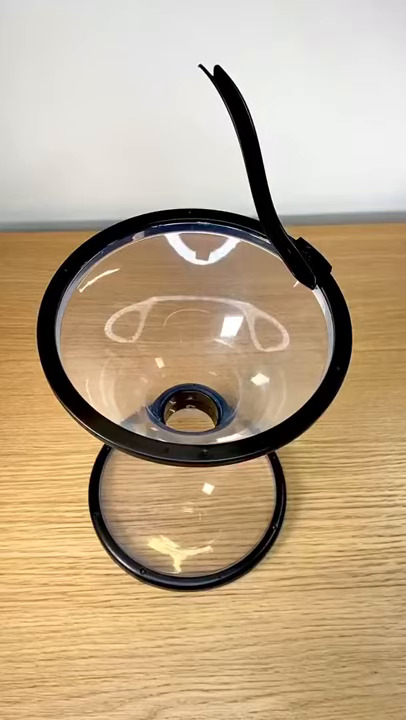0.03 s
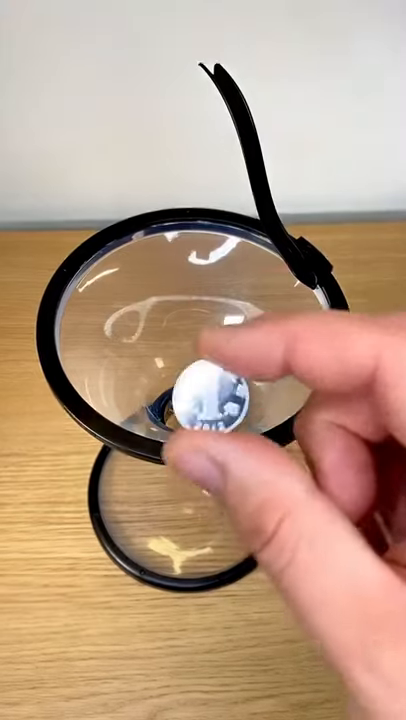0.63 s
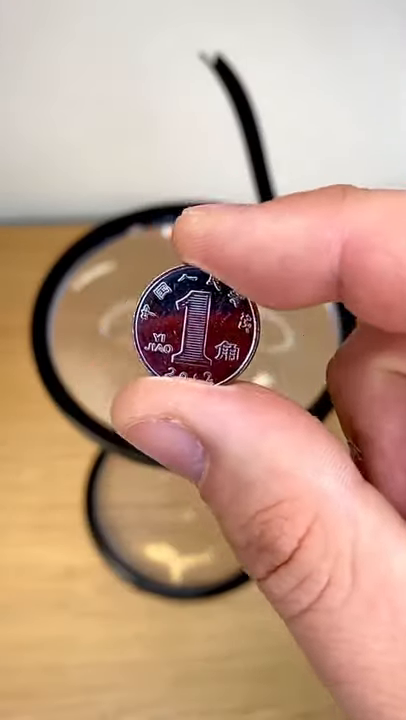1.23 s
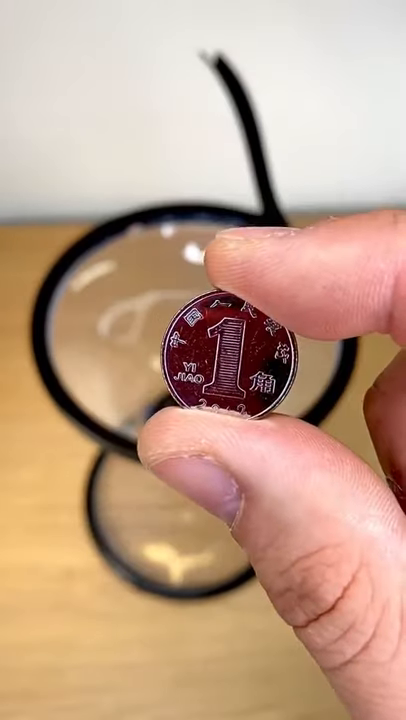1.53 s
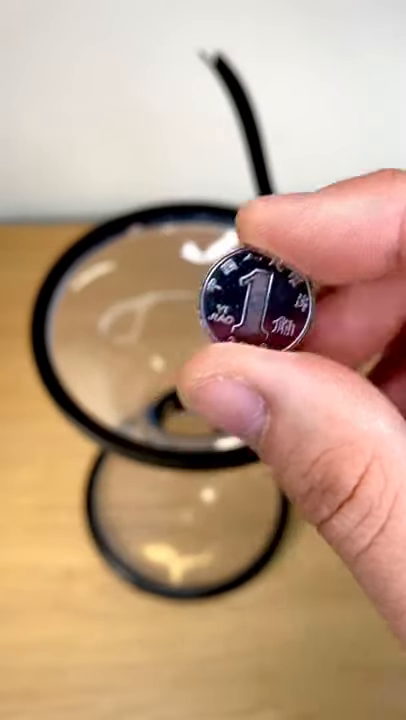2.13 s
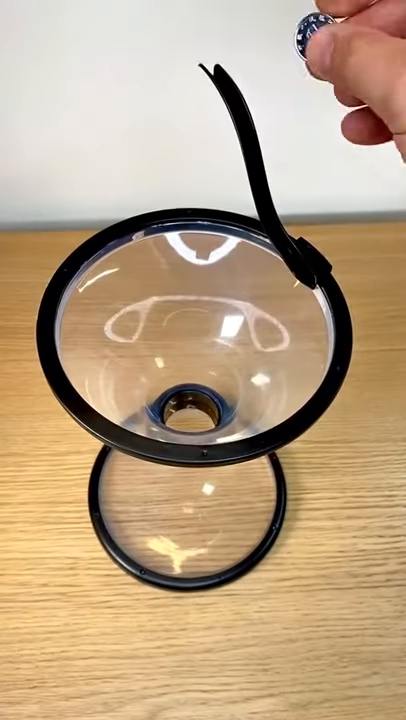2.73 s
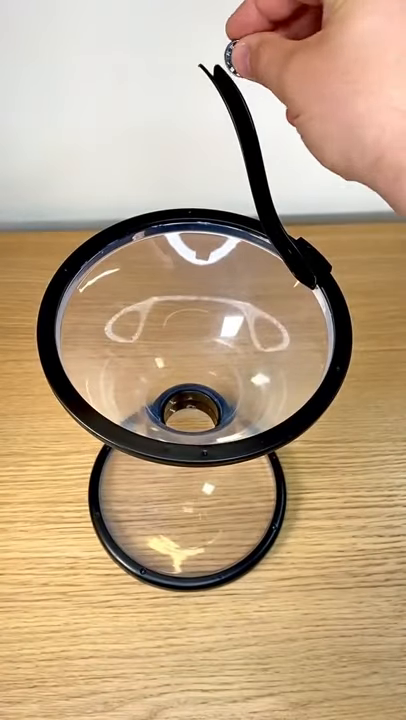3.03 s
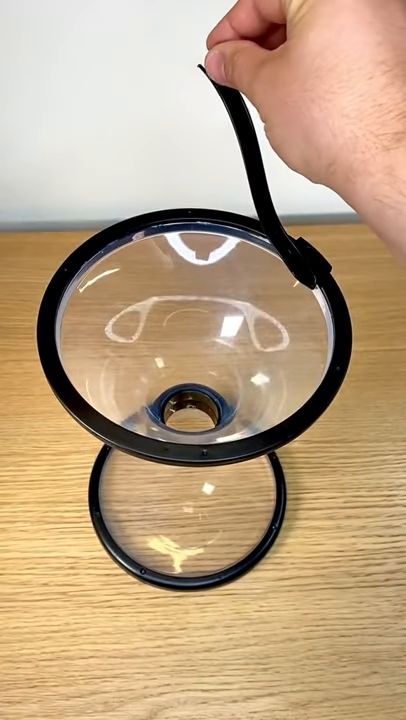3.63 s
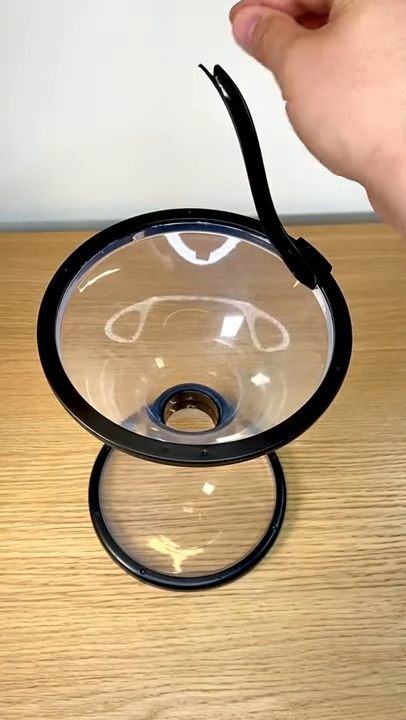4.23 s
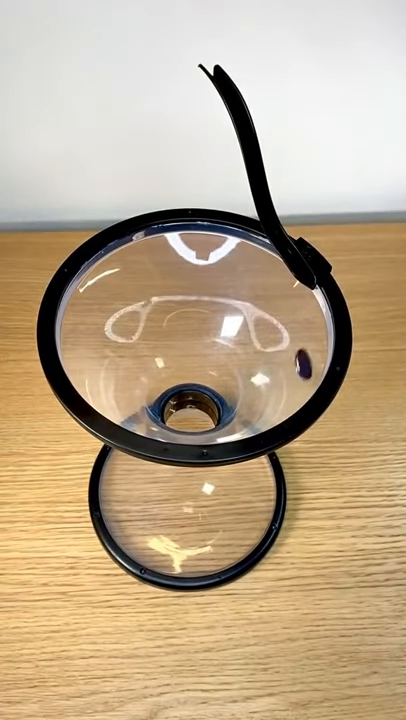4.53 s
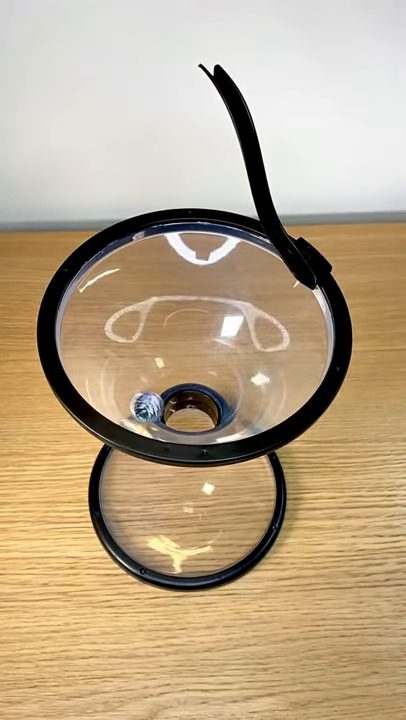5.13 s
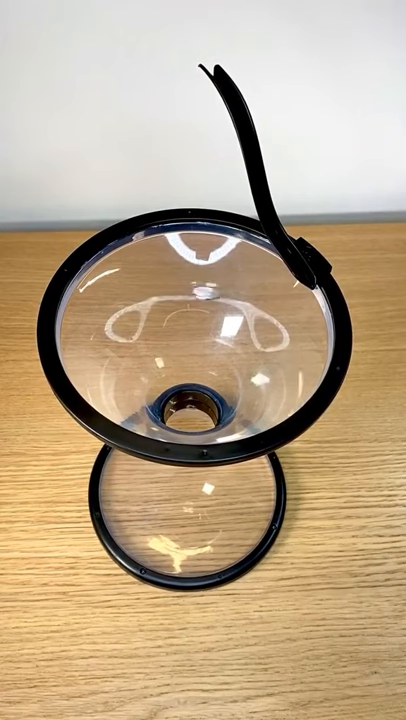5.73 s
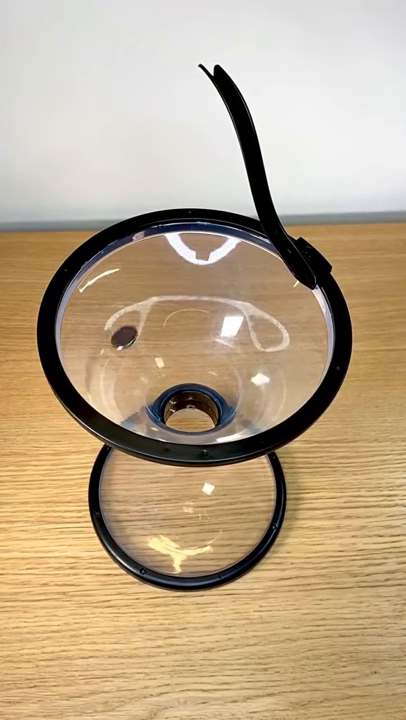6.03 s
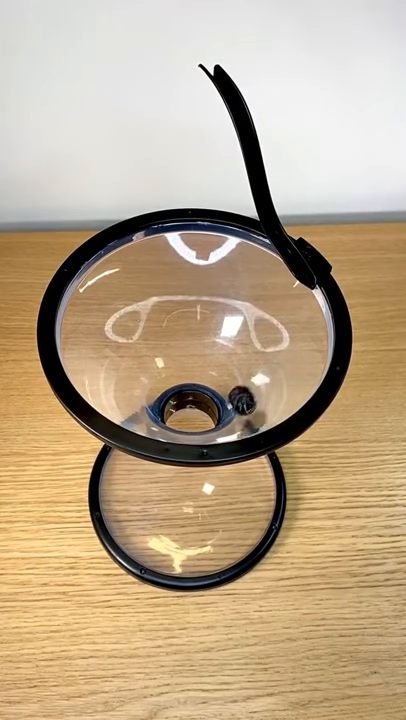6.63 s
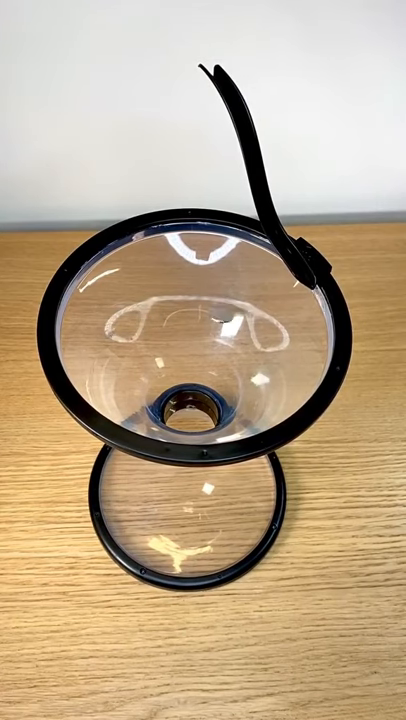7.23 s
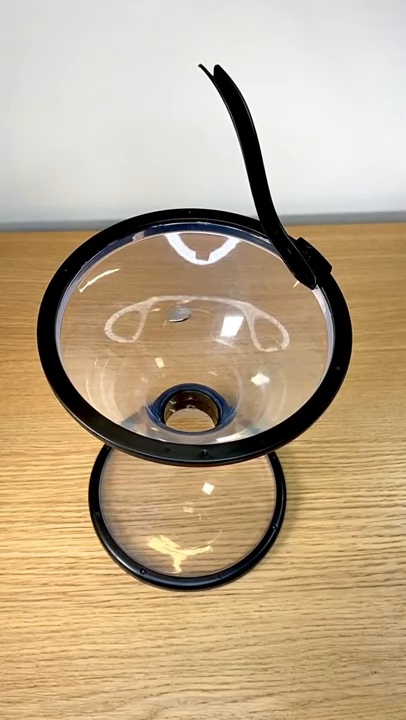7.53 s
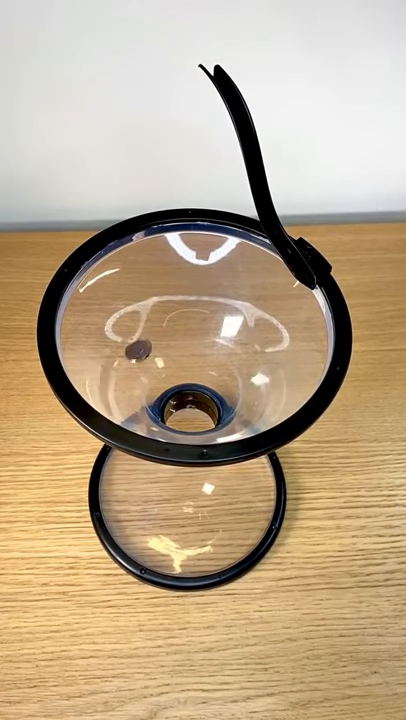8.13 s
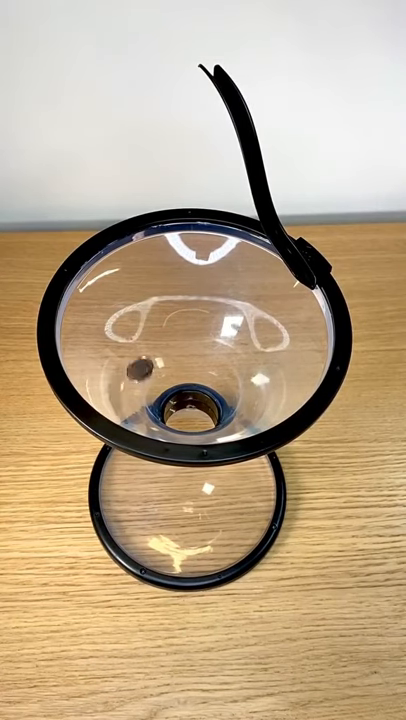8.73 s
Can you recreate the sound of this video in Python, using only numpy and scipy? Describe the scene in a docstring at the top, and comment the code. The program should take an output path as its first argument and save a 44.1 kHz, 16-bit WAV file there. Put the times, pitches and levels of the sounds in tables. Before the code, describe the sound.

In a small room with a low ventilation rumble, fingers faintly brush a small coin and seat it in a plastic chute with a few short scrapes. The coin rattles down and strikes the bowl of a plastic funnel with a sharp clack. It then rolls round continuously, with a hollow throb on each lap and tiny gritty crunches, gradually getting faster and louder. The sound is close and fairly dry.

```python
"""A ventilation rumble fills a small room. Fingers brush a small coin and seat it, sticking and slipping,
in the plastic chute of a coin funnel. Let go, it rattles down the chute and strikes the bowl, and the
funnel rocks on its stand. The coin then circles faster and louder as it sinks: the tiny bumps of its rim
excite the modes of the shell, the hollow mode throbs on every lap, and specks crunch under the rim."""
import sys
import numpy as np
from scipy import signal
from scipy.fft import rfft, irfft
from scipy.io import wavfile
from scipy.ndimage import uniform_filter1d, map_coordinates

SR = 44100
rng = np.random.default_rng(int(sys.argv[2]) if len(sys.argv) > 2 else 0)


def put_to_file(sound):
    """Save the sound as 16-bit audio at rate SR, in the file named by the first command-line argument."""
    columns = np.atleast_2d(sound).T  # one column per channel
    safe = np.clip(columns, -1, 1)
    whole_steps = np.round(safe * 32767)
    wavfile.write(sys.argv[1], SR, whole_steps.astype(np.int16))


N = 396018
TIME = np.arange(N) / SR
RESPONSE_SAMPLES = 32768
LANDS_S = 4.45


def undb(db):
    """Amplitude ratio of a level in decibels."""
    return 10 ** (np.asarray(db) / 20)


def unit(x):
    """Normalisation to an rms of one."""
    return x / np.sqrt(np.mean(x ** 2))


def even(x, span_s):
    """Division by the running rms: slow changes of level vanish, quicker flutter stays."""
    return x / np.sqrt(np.abs(uniform_filter1d(x ** 2, int(span_s * SR))) + 1e-6)


def curves(table):
    """Linear interpolation of each column over the times in the first."""
    times_s, *columns = np.transpose(table)
    return [np.interp(TIME, times_s, column) for column in columns]


def swell(time_s, width_s):
    """Gaussian envelope about a moment."""
    return np.exp(-((TIME - time_s) / width_s) ** 2 / 2)


def walk(rate_hz):
    """Slow random fluctuation with a spread near one."""
    return np.interp(TIME * rate_hz, np.arange(4096), rng.standard_normal(4096)) * np.sqrt(3 / 2)


def cut(x, hz, kind, order=2):
    """Maximally flat low-pass or high-pass filter."""
    return signal.sosfilt(signal.butter(order, min(hz, .45 * SR), kind, fs=SR, output="sos"), x)


def convolve(x, response):
    """Output of a linear system, given its impulse response."""
    return signal.oaconvolve(x, response)[:N]


def ring(modes):
    """Minimum-phase impulse response, of unit energy, of steep-sided resonances."""
    freq = np.maximum(np.arange(RESPONSE_SAMPLES // 2 + 1) * SR / RESPONSE_SAMPLES, 1)
    power = sum(undb(db) ** 2 / (1 + ((freq / hz - hz / freq) * hz / width_hz) ** 2) ** 2
                for hz, width_hz, db in modes)
    cepstrum = irfft(np.log(power + 1e-9))
    cepstrum[RESPONSE_SAMPLES // 2:] = 0
    cepstrum[0] = 0
    response = irfft(np.exp(rfft(cepstrum)))
    return response / np.linalg.norm(response)


def bumps(per_s, spread_db):
    """Roughness excitation: tiny impacts at random moments and of uneven size."""
    hits = rng.random(N) < per_s / SR
    return unit(hits * rng.choice([-1, 1], N) * undb(spread_db * rng.standard_normal(N)))


def knocks(table):
    """Impact force: each blow is a decaying broadband chatter, duller for a softer contact."""
    force, t = np.zeros(N), TIME[:8192]
    for start_s, db, chatter_s, corner_hz in table:
        spectrum = rfft(rng.standard_normal(len(t)) * np.exp(-t / chatter_s))
        white = irfft(spectrum / np.abs(spectrum))  # drives all modes alike
        blow = white * np.exp(-t / chatter_s / 4)
        blow *= np.sqrt(chatter_s * SR / 2) / np.linalg.norm(blow)
        start = int(start_s * SR)
        force[start:start + len(t)] += undb(db) * cut(blow, corner_hz, "low")
    return force


def nodes(x, depth_db, rate_hz, spacing_hz):
    """Modal coupling: a moving contact crosses nodes and antinodes, so each band flares and fades."""
    hz, times_s, spectrum = signal.stft(x, SR, nperseg=1024, noverlap=768)
    shapes = rng.standard_normal((512, 1024))
    positions = np.meshgrid(hz / spacing_hz, times_s * rate_hz, indexing="ij")
    coupling = map_coordinates(shapes, positions, order=2, mode="wrap")
    gain = unit(undb(depth_db * np.clip(coupling, -2, 2)))
    return signal.istft(spectrum * gain, SR, nperseg=1024, noverlap=768)[1][:N]


def throbs(table, wander_hz, flutter_db):
    """Tone bursts: a mode flares up and dies down, a little unsteady in pitch and level."""
    drift_cycles = np.cumsum(wander_hz * walk(140)) / SR
    bursts = np.zeros(N)
    for time_s, db, width_s, hz in table:
        near = np.abs(TIME - time_s) < 4 * width_s
        t = TIME[near] - time_s
        envelope = undb(db) * np.exp(-(t / width_s) ** 2 / 2)
        bursts[near] += envelope * np.sin(2 * np.pi * (hz * t + drift_cycles[near]))
    return bursts * undb(flutter_db * walk(170))


def ventilation():
    """Broadband flow noise: a low rumble that wavers a little, with a faint steady hiss."""
    # spectrum of the rumble and hiss: frequency_hz, density_db
    noise_spectrum = [(20, -39), (30, -20), (40, 5), (56, -14.5), (80, 1), (100, -9), (125, -2.5),
                      (160, -18), (280, -19), (440, -27.5), (600, -47.5), (2800, -44), (6000, -51.5),
                      (13000, -60.5)]
    hz, db = np.transpose(noise_spectrum)
    freq = np.maximum(np.arange(N // 2 + 1) * SR / N, 1)
    gain = undb(np.interp(np.log(freq), np.log(hz), db))
    noise = unit(irfft(rfft(rng.standard_normal(N)) * gain, N))
    upper_rumble = cut(cut(noise, 170, "high", order=1), 500, "low", order=1)
    return undb(-63) * (noise + 0.25 * walk(5.0) * upper_rumble)


def reverberation(x, low_t60_s=0.38, treble_t60_s=0.18):
    """Diffuse reflections decay exponentially, the treble sooner."""
    t, noise = TIME[:RESPONSE_SAMPLES], rng.standard_normal(RESPONSE_SAMPLES)
    low = cut(noise, 4000, "low", order=1)
    tail = low * undb(-60 * t / low_t60_s) + (noise - low) * undb(-60 * t / treble_t60_s)
    tail *= np.clip((t - .003) / 0.00034, 0, 1)  # the first reflection takes 3 ms
    return convolve(x, tail / np.linalg.norm(tail))


def stand(shaking):
    """Forced vibration: shaking and a few smooth pushes rock the whole funnel on its stand."""
    # rocking modes: pitch_hz, width_hz, level_db
    stand_modes = [(77.7, 8.5, -10.5), (93.4, 9.1, 1), (104.5, 10.5, 3), (122.7, 13.4, -7.5),
                   (135.1, 4.2, 0.5), (160, 17, -12), (195.5, 16.5, -8.5), (250, 18, -10.5),
                   (343, 41, -13.5)]
    # jolts to the stand: time_s, level_db, width_s
    jolts = [(3.507, -62.5, 0.002), (3.926, -48.5, 0.0024), (4.375, -46.5, 0.00059), (4.451, -44.5, 0.002),
             (8.768, -57, 0.0016)]
    pushes = sum(undb(db) * swell(time_s, width_s) for time_s, db, width_s in jolts)
    return convolve(shaking + pushes, ring(stand_modes))


def fingers():
    """Sliding friction: skin brushes the coin in swells of band-limited noise."""
    # shifts of the fingers: time_s, level_db, width_s, centre_hz, width_hz
    shifts = [(.16, -86, 0.14, 1780, 4350), (2.27, -83, 0.02, 10900, 6000), (2.70, -76, 0.084, 2550, 3000),
              (2.72, -84, 0.066, 8000, 8000), (2.767, -52, 0.0006, 2620, 2480),
              (2.785, -67, 0.028, 2660, 1530), (3.386, -73, 0.0072, 5000, 4000),
              (3.43, -81, 0.026, 3580, 4000)]
    brushing = np.zeros(N)
    for time_s, db, width_s, centre_hz, width_hz in shifts:
        friction = rng.standard_normal(N) * swell(time_s, width_s)
        brushing += undb(db) * convolve(friction, ring([(centre_hz, width_hz, 0)]))
    return cut(brushing, 690, "high", order=4)


def slot_scrape():
    """Stick-slip friction: each slip of the coin flexes the hand-damped chute and rasps on it."""
    # modes of the chute while the hand holds it: pitch_hz, width_hz, level_db
    held_modes = [(495, 85, -11), (600, 50, -18), (748, 150, -6.5), (1064, 150, -12), (1280, 520, -20),
                  (1770, 80, -19), (2040, 97, -24), (2160, 67, -27), (2860, 170, -20), (3670, 220, -28.5),
                  (4430, 110, -43), (4720, 420, -33), (4980, 200, -36), (5650, 350, -47), (6500, 700, -52),
                  (9100, 1300, -48), (10500, 1000, -48)]
    # slips as the coin is seated, then freed: time_s, level_db, width_s, pitch_hz
    slips = [(3.247, -44, 0.0046, 735), (3.269, -41, 0.0085, 730), (3.3, -45, .004, 745),
             (3.333, -47, .005, 755), (3.379, -47, 0.0034, 814), (3.395, -45.5, .004, 730),
             (3.905, -37.5, 0.0039, 770), (3.9158, -30, 0.0016, 810), (3.926, -33, 0.0031, 754)]
    rub = undb(-55.5) * ((TIME > 3.24) & (TIME < 3.402))
    grit = undb(-6) * sum(undb(db) * swell(time_s, width_s) for time_s, db, width_s, _ in slips)
    rasp = convolve(bumps(1200, spread_db=2) * np.hypot(rub, grit), ring(held_modes))
    return rasp + throbs(slips, wander_hz=60.1, flutter_db=2)


def chute():
    """Chute resonance: the coin knocks, drags free and rolls, briefly brighter before it lands."""
    # modes of the chute: pitch_hz, width_hz, level_db
    chute_modes = [(403, 77, -12.5), (484.5, 21, -0.5), (722, 150, -1), (832, 105, -2.5), (1080, 150, -13),
                   (1243, 94, -15), (1630, 97, -11.5), (2085, 240, -9), (2020, 1700, -16.5),
                   (2710, 120, -9), (2820, 290, -4.5), (3180, 150, -9.5), (3480, 190, -10.5),
                   (3260, 980, -11.5), (3870, 150, -9), (4420, 110, -6), (4940, 180, -8), (5000, 2200, -17),
                   (5600, 190, -11.5), (5960, 130, -18), (7100, 3200, -18), (9000, 2400, -14),
                   (11400, 2850, -21)]
    # rolling contact down the chute: time_s, level_db, sharpness (0 to 1)
    descent = [(4.09, -62, 0), (4.14, -51.5, 0), (4.166, -43, 0), (4.19, -47.5, 0), (4.29, -39.5, 0.14),
               (4.32, -53, 1), (4.357, -26, 1), (4.399, -27, 0.33), (4.445, -38, 0)]
    # knocks and rattles: start_s, level_db, chatter_s, corner_hz
    rattles = [(3.393, -44.5, 0.0095, 4860), (3.9103, -27.5, 0.004, 15000), (3.9135, -24, 0.0059, 15000),
               (3.918, -27, 0.0065, 12000), (3.934, -38, 0.008, 12000), (4.288, -40, 0.0095, 6000),
               (4.324, -43, .01, 12000), (4.36, -30, 0.0021, 12000), (4.392, -29, 0.0054, 8000)]
    db, sharpness = curves(descent)
    descending = (TIME > descent[0][0]) & (TIME < descent[-1][0])
    rim = bumps(1800, spread_db=0.5)
    soft = cut(rim, 900, "low", order=1)
    roll = (soft + sharpness * (rim - soft)) * undb(db) * descending
    drag_s, drag_db, chatter_s, drag_hz = 3.9118, -21.5, 0.0084, 930  # dull exit from the slot
    drag = cut(knocks([(drag_s, drag_db, chatter_s, 2 * drag_hz)]), drag_hz, "low", order=4)
    roll = cut(nodes(roll, depth_db=4.2, rate_hz=60, spacing_hz=130), 11600, "low", order=6)
    blows = drag + knocks(rattles)
    response = ring(chute_modes)
    return convolve(roll, response), convolve(blows, response), roll + blows


def landing():
    """Impact excitation: the coin strikes the bowl and skips; gives the sound and its force."""
    # blows on the bowl: start_s, level_db, chatter_s, corner_hz
    blows = [(4.442, -18, 0.0071, 6000), (4.4463, -13.5, 0.0048, 12100), (4.453, -19.5, 0.0018, 12000),
             (4.618, -30.5, 0.012, 14000)]
    # modes of the struck wall: pitch_hz, width_hz, level_db
    struck_modes = [(487, 120, -6), (691, 110, 3), (845, 130, -2), (1170, 140, -2), (1626, 190, -4.5),
                    (1870, 120, 6), (1950, 75, -2), (2264, 120, -3.5), (2590, 120, -0.5), (2840, 290, -5),
                    (3230, 88, 0.5), (3574, 110, -5.5), (3890, 150, -7), (4100, 90, -16), (4600, 100, -2.5),
                    (4740, 170, -22), (5200, 98, -7.5), (5900, 160, -8), (4200, 3200, -15),
                    (8040, 2700, -20.5), (10200, 2200, -22)]
    force = knocks(blows)
    return convolve(force, ring(struck_modes)), force


def rim_load(spin_hz, wobble_db, flutter_db):
    """Contact load: light until the coin settles, and varying with each turn of its uneven rim."""
    turn = 2 * np.pi * np.cumsum(spin_hz * (1 + 0.069 * walk(3.5))) / SR
    load_db = wobble_db * (np.sin(turn) + 0.28 * np.sin(2 * turn)) + flutter_db * walk(60)
    settling_db = -2 * swell(LANDS_S, width_s=0.35)
    landed = np.clip((TIME - LANDS_S) / 0.048, 0, 1)
    return undb(load_db + settling_db) * landed


def specks(load):
    """Abrasion: the rim scrapes unevenly over fine dust and crunches on larger specks."""
    # specks crushed under the rim: time_s, level_db
    crushed = [(4.622, -67), (4.986, -62), (6.145, -42.5), (6.228, -48), (7.222, -54), (7.493, -54),
               (7.694, -50), (7.885, -49), (8.015, -48), (8.347, -45.5), (8.4, -47.5), (8.602, -49),
               (8.664, -45), (8.792, -42)]
    dust = load * undb(-67 + 5 * walk(35))
    crunches = sum(undb(db) * swell(time_s, 0.0066) for time_s, db in crushed)
    grit = bumps(8000, spread_db=0.5)
    return convolve(grit * (dust + undb(-3.5) * crunches), ring([(7620, 2600, 0)]))


def pings(modes, per_s=55, width_s=.006, detune_hz=18, spread_db=5):
    """Selective excitation: the rim catches one mode at a time, those with more energy more often."""
    count = int((N / SR - LANDS_S) * per_s)
    hz, width_hz, db = np.transpose(modes)
    cumulative_energy = np.cumsum(undb(db) ** 2 * width_hz)
    bursts = []
    for k, (late, pick, size, detune) in enumerate(rng.random((count, 4))):
        mode = np.searchsorted(cumulative_energy, pick * cumulative_energy[-1])
        pitch_hz = hz[mode] + detune_hz * (2 * detune - 1)
        bursts.append((LANDS_S + (k + late) / per_s, spread_db * size, width_s, pitch_hz))
    return even(throbs(bursts, wander_hz=25, flutter_db=.8), span_s=.1)


def bowl(load):
    """Rolling noise: rim roughness drives four families of shell modes; gives the sound and its force."""
    # modes of the bowl: pitch_hz, width_hz, level_db
    modes = [(208.6, 99, -22.5), (292.4, 9.6, -20), (410.8, 55, -12), (492.6, 63, -11.5), (619, 110, -11.5),
             (694.5, 129, -10), (803, 49, -2), (882, 346, -11), (996, 64, -9), (1138.5, 55, -7.5),
             (1354, 420, -22.5), (1782, 500, -14), (1894, 225, -5), (1967, 92, -2.5), (2079, 78, 2),
             (2270, 260, -13), (2368, 114, -11.5), (2630, 97, -17.5), (2526, 1230, -12), (2900, 80, -10),
             (3170, 52, -17.5), (3100, 790, -21.5), (3552, 96, -14), (3870, 49, -18), (4110, 570, -19),
             (4520, 92, -14), (4360, 260, -26.5), (4950, 1810, -18.5), (6350, 720, -25),
             (7500, 1950, -29.5), (9200, 3000, -34.5)]
    # the orbit quickens as the coin sinks: time_s, laps_per_s
    lap_rates = [(4.45, 2.049), (5.5, 2.438), (7, 2.854), (8.98, 3.406)]
    # the coin leans harder on the wall: time_s, width_s, wall_boost_db, fine_boost_db
    leans = [(4.758, .008, 7, 3), (4.846, .012, 4, 3), (4.908, .01, 4.5, 4), (4.981, 0.0089, 1, 2.5),
             (5.279, .007, 1, 2), (5.333, 0.019, 2.5, 2.5), (5.401, 0.0063, 0, 2.5),
             (5.468, 0.0074, 3, 0.5), (5.708, .01, 5.5, -0.5), (5.738, 0.0061, 3.5, 1),
             (6.082, 0.0082, 4.5, 1.5), (6.094, 0.0072, 5.5, 0.5), (6.153, .012, -1.5, 3.5),
             (6.438, .018, 1, 4), (6.48, 0.0046, 6, -2), (6.634, .0079, 6.5, 1.5), (7.025, 0.0065, 3, 0),
             (7.223, 0.0096, 1, 5), (7.435, 0.0057, 4.5, -3), (7.496, .008, -1, 2.3),
             (7.52, 0.014, 4.5, 2.5), (7.892, 0.0069, 6, 2), (8.02, 0.0047, 4.5, 5), (8.214, 0.015, 2, 4),
             (8.332, 0.0075, 2.5, 1), (8.478, .012, 2.5, 1), (8.545, 0.011, 7.5, 1.5),
             (8.667, .009, 5, 2.3), (8.798, 0.015, 6.5, 1.5), (8.852, 0.0074, 6, -0.5),
             (8.93, 0.0075, 3, 3)]
    # the landing's boom, then hollow throbs clustered on each lap: time_s, level_db, width_s, pitch_hz
    hollow_throbs = [(4.45, -20, .004, 660), (4.472, -36, 0.014, 690), (4.512, -38, 0.025, 691),
                     (4.567, -42, .017, 700), (4.746, -39.5, .015, 692), (4.809, -43, .016, 695),
                     (4.904, -41, 0.018, 700), (5.178, -37.5, 0.015, 705), (5.343, -34.5, 0.015, 709),
                     (5.473, -31, .011, 698), (5.51, -41, .02, 681), (5.77, -36, .01, 688),
                     (5.897, -31.5, 0.013, 694), (5.999, -37, 0.0083, 699), (6.276, -34.5, 0.023, 711),
                     (6.367, -43, 0.023, 682), (6.47, -41, .011, 697), (6.531, -38, 0.011, 707),
                     (6.637, -29.5, 0.0058, 710), (6.671, -38, 0.01, 720), (6.741, -42, 0.013, 712),
                     (6.9, -34.5, 0.019, 685), (6.944, -37, 0.008, 710), (6.99, -29, 0.0086, 704),
                     (7.031, -30.5, 0.012, 690), (7.225, -34, 0.011, 685), (7.285, -38.5, .013, 720),
                     (7.34, -34, 0.01, 700), (7.374, -30, 0.011, 712), (7.568, -32, 0.02, 692),
                     (7.639, -36, 0.0081, 687), (7.68, -29.5, 0.012, 712), (7.883, -33, 0.022, 673),
                     (7.958, -31.5, 0.0095, 710), (8.024, -26.5, 0.0088, 722), (8.215, -25.5, 0.011, 682),
                     (8.285, -32, 0.011, 734), (8.333, -29.5, 0.018, 689), (8.488, -37.5, 0.017, 662),
                     (8.536, -30, 0.01, 683), (8.578, -33, 0.011, 748), (8.635, -32.5, 0.013, 708),
                     (8.669, -31.5, .011, 703), (8.803, -25.5, 0.011, 695), (8.878, -31, .01, 691),
                     (8.94, -30.5, 0.017, 706)]
    age_s = np.maximum(TIME - LANDS_S, 0)
    laps = np.cumsum(curves(lap_rates)[0] * (age_s > 0)) / SR
    hollow_db = -49.5 + 2 * np.cos(2 * np.pi * (laps - 0.17))  # one swell a lap
    bending_db = -43.5 + 0.75 * age_s
    wall_db = -41.5 + 0.52 * age_s + 0.7 * np.cos(4 * np.pi * (laps - 0.39))  # two swells a lap
    fine_db = -41 + 0.22 * age_s
    for time_s, width_s, wall_boost_db, fine_boost_db in leans:
        lean = swell(time_s, width_s)
        wall_db += wall_boost_db * lean
        fine_db += fine_boost_db * lean

    hollow_modes = [m for m in modes if 650 < m[0] < 750]
    bending_modes = [m for m in modes if m[0] < 1250 and m not in hollow_modes]
    wall_modes = [m for m in modes if 1700 < m[0] < 2160]
    strong_wall_modes = [m for m in wall_modes if m[2] > -11]
    fine_modes = [m for m in modes if m not in hollow_modes + bending_modes + wall_modes]

    rim = bumps(7000, spread_db=1.5)
    hollow = convolve(rim, ring(hollow_modes))
    bending = nodes(convolve(rim, ring(bending_modes)), depth_db=2.6, rate_hz=22, spacing_hz=70)
    wall = nodes(convolve(rim, ring(wall_modes)), depth_db=3.3, rate_hz=36, spacing_hz=65)
    wall += undb(-1) * pings(strong_wall_modes)
    fine = nodes(convolve(rim, ring(fine_modes)), depth_db=4.0, rate_hz=40, spacing_hz=85)
    shell = (undb(hollow_db) * even(hollow, span_s=.03)
             + undb(bending_db) * even(bending, span_s=.1)
             + undb(wall_db) * even(wall, span_s=.07)
             + undb(fine_db) * cut(even(fine, span_s=.06), 10950, "low", order=8))
    throbbing = throbs(hollow_throbs, wander_hz=18, flutter_db=1.5)
    return load * shell + throbbing, load * rim * undb(fine_db)


def scene():
    """Superposition of direct sound and reverberation; only the treble echoes are wide."""
    running, rattling, chute_force = chute()
    strike, strike_force = landing()
    seating = slot_scrape()
    load = rim_load(spin_hz=18.0, wobble_db=0.63, flutter_db=0.78)
    rolling, rolling_force = bowl(load)
    shaking = undb(-22.5) * chute_force + undb(-16) * strike_force + undb(-20.5) * rolling_force
    launch = fingers() + running + rattling + strike
    near = rolling + stand(shaking) + specks(load)
    # the bowl is nearer than the chute, so it sounds drier; the hand shields the slot from the room
    into_room = launch + undb(-6) * seating + undb(-5) * near
    mid = launch + seating + near + undb(-8.5) * reverberation(into_room) + ventilation()
    echoes = reverberation(near + undb(-8.5) * running + undb(-12) * launch)
    treble = cut(cut(echoes, 4610, "high", order=20), 5500, "high")
    side = undb(-4.5) * cut(treble, 8900, "low", order=4)
    return np.array([mid + side, mid - side])


def record(dry):
    """Gating and band limiting: the sound fades in after a moment and loses its highest treble."""
    start_s, top_hz = .08, 13000
    fade_in = np.clip((TIME - start_s) / .01, 0, 1)
    return signal.sosfilt(signal.ellip(8, .2, 70, top_hz, fs=SR, output="sos"), dry * fade_in)


dry = scene()
out = record(dry)
put_to_file(out)
```